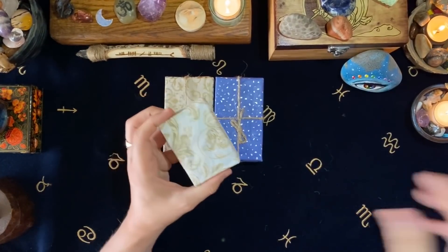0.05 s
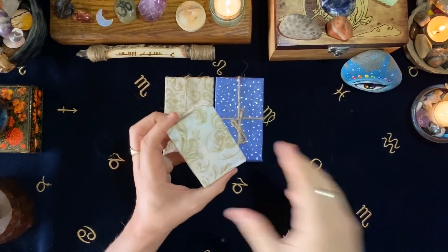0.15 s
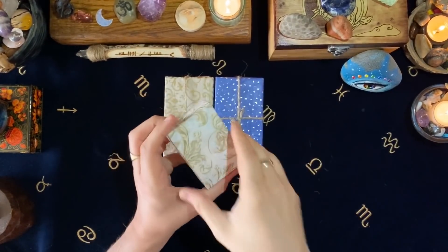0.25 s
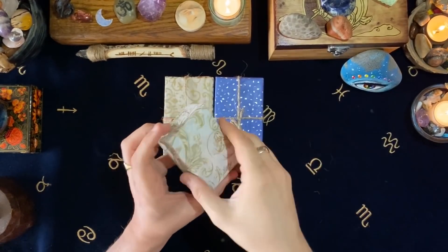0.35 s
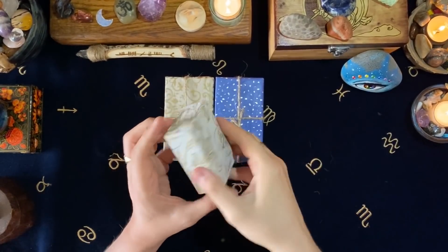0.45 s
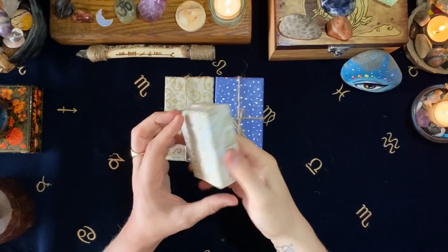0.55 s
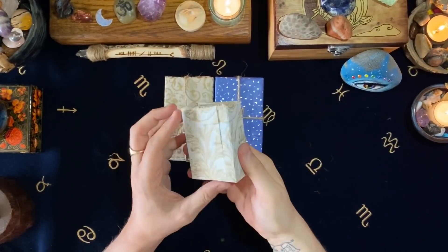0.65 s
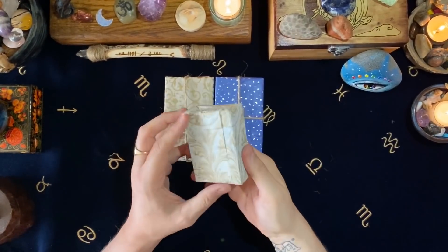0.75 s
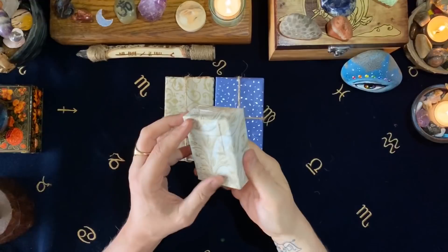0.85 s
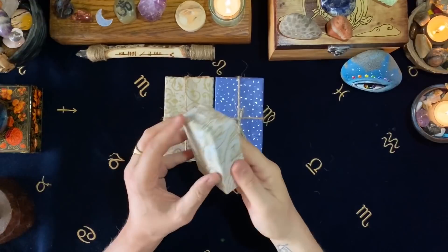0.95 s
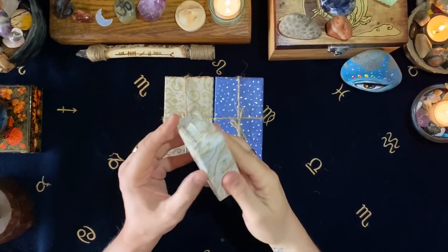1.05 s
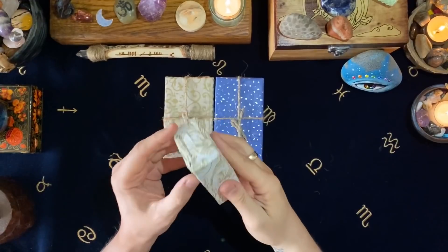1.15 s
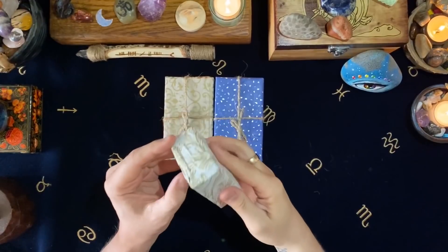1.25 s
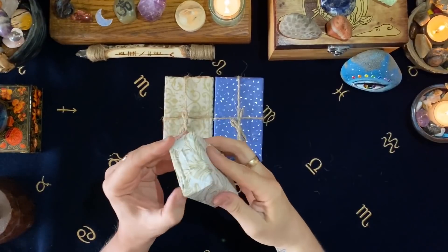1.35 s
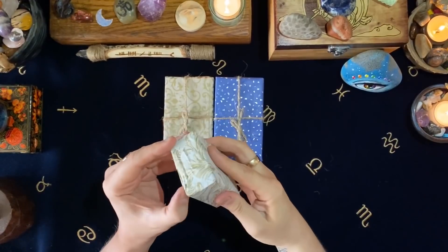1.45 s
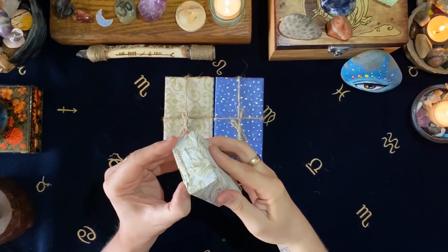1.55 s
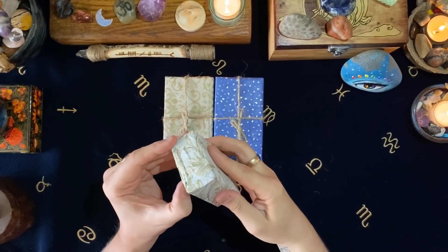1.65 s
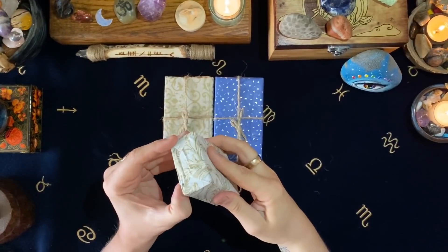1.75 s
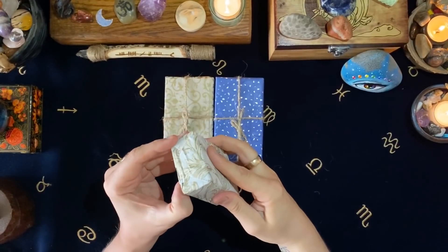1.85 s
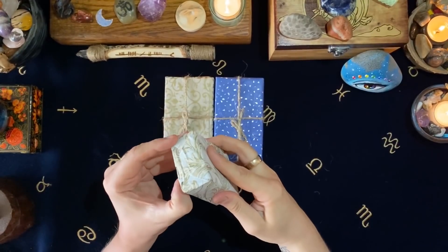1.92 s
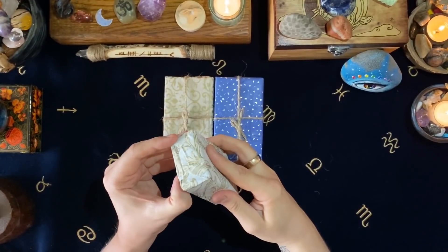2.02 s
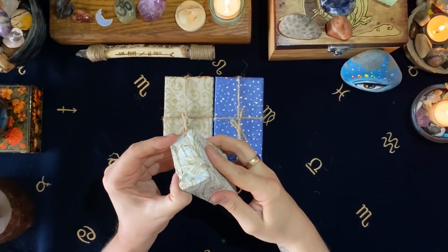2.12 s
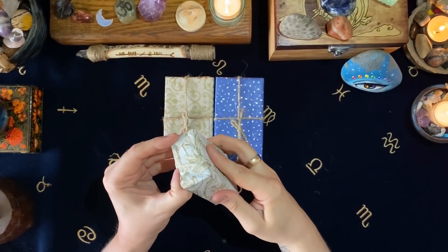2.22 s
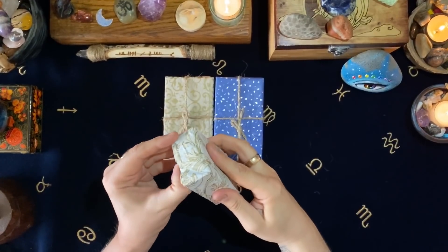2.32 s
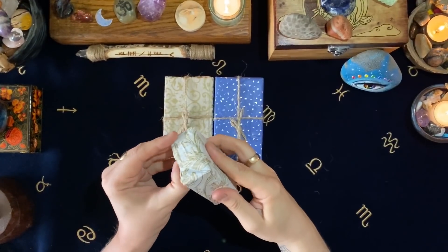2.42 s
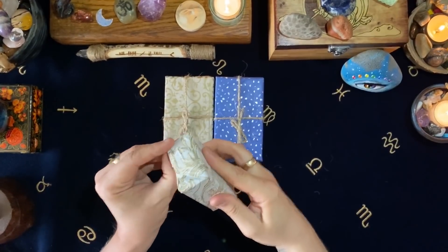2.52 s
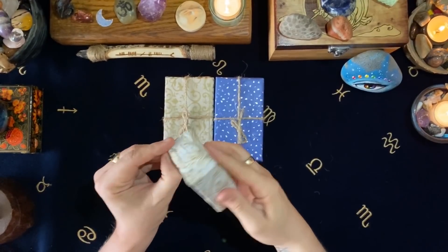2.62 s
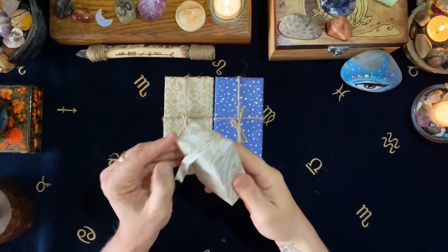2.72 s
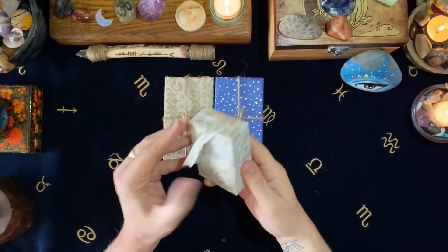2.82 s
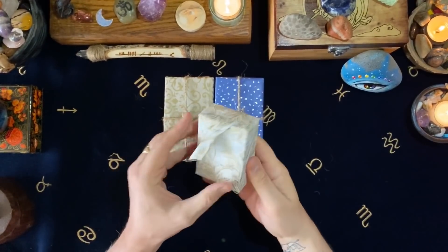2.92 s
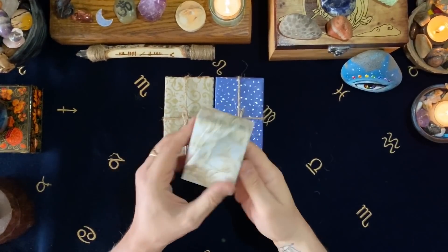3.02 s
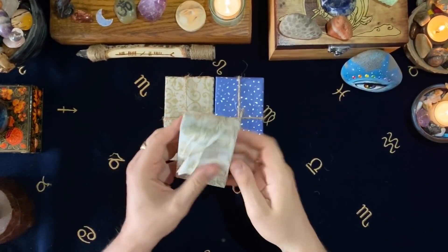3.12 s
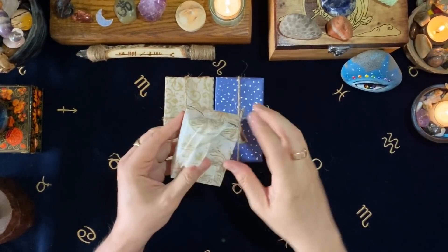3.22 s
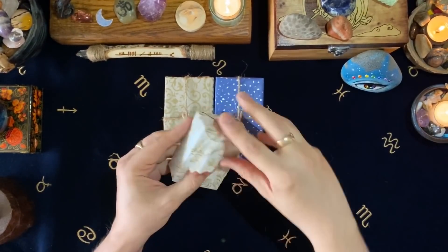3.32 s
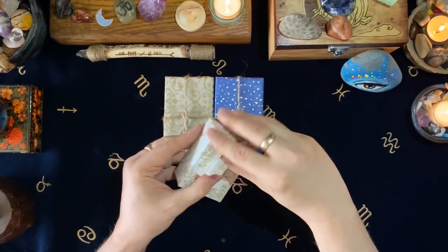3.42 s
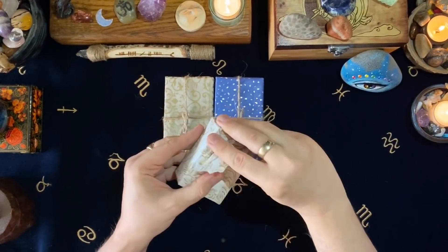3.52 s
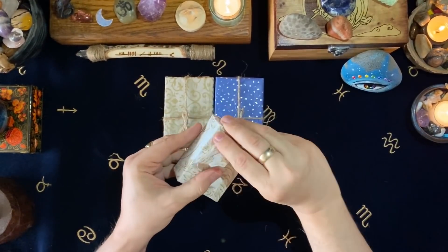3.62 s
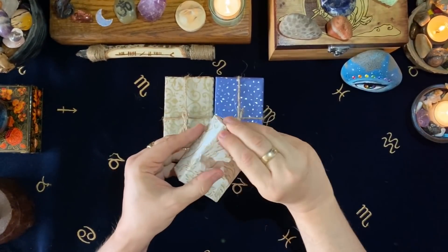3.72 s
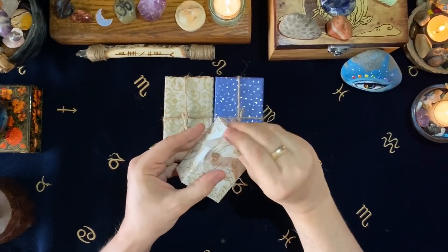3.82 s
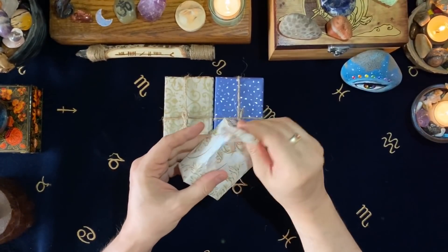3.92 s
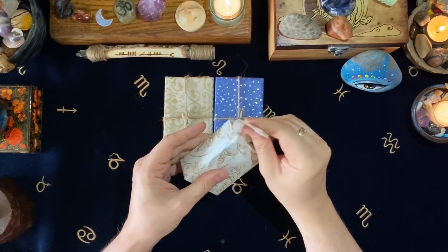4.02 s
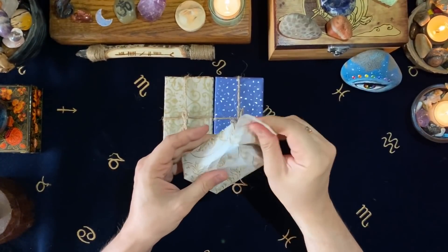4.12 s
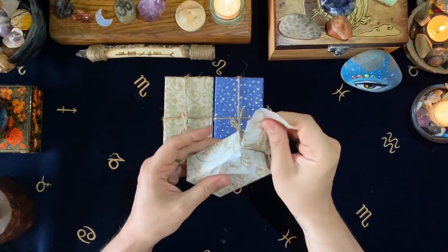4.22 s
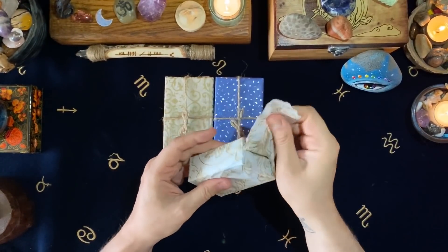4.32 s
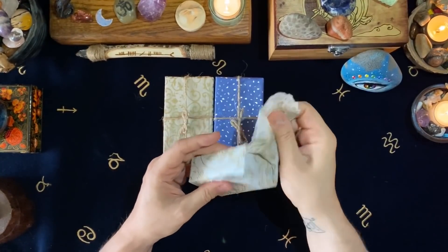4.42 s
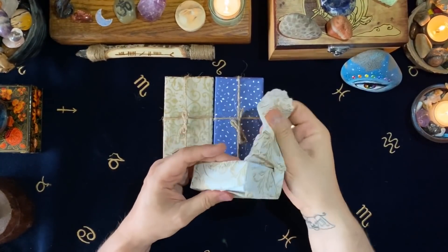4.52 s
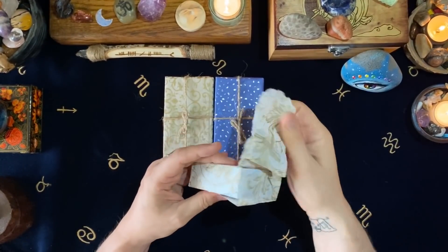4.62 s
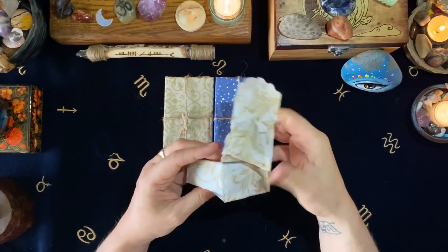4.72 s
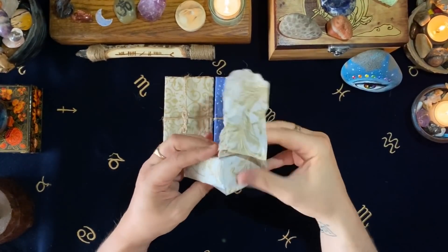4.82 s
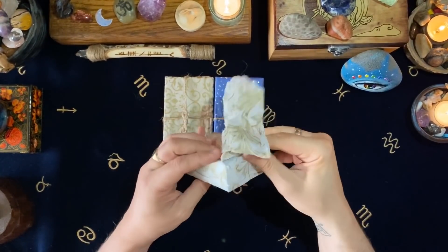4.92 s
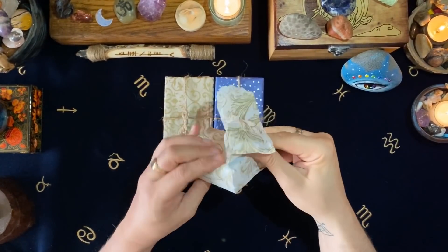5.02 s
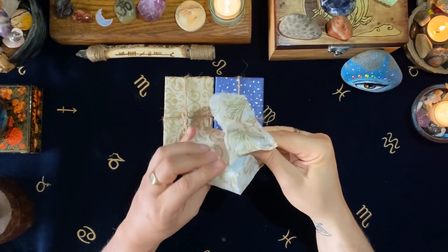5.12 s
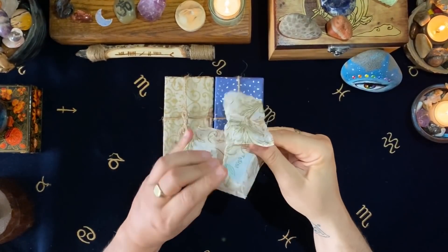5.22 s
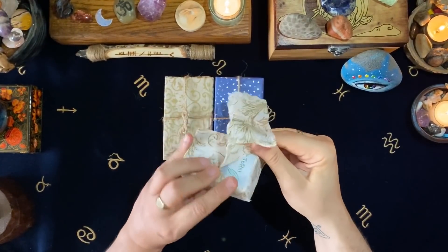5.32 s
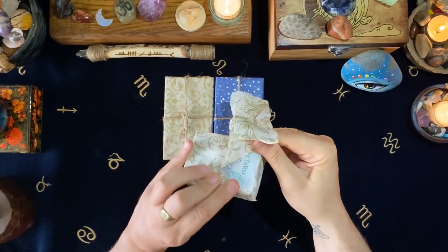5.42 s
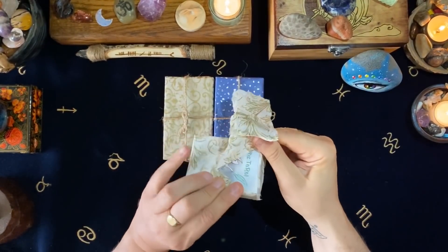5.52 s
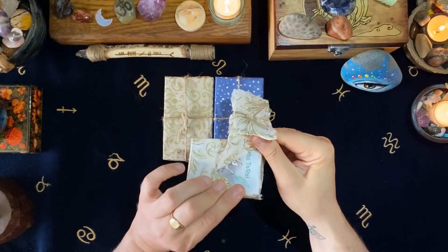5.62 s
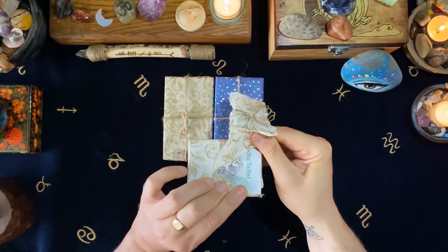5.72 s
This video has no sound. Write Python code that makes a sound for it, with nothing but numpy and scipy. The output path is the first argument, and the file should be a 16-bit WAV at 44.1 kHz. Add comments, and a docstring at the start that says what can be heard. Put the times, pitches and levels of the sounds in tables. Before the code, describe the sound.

Close stereo sound of stiff wrapping paper in a quiet, fairly dry room. Faint finger slides and creases come first, then a tight cluster of bright snaps, a softer pause, long crisp peeling strokes, a hard tear with a dull hollow knock from the box, and finally irregular snapping and rustling. Low rumble and very slight hiss lie beneath.

```python
"""Paper crackles, rubs, snaps and rips over a quiet room rumble, as two hands unwrap a small box.
They turn the parcel, pick an end flap loose, flip it, peel, rip the wrapper open and fold it back.
Crackle is a stream of tiny fibre releases that ring the hollow parcel, the sheet and its small facets.
Snaps are bursts of noise, drags are gliding resonances, and bumps are damped low tones.
A close microphone with two ports hears it all; the room is a faint echo, shaped noise and two tones."""
import sys
import numpy as np
from scipy import signal
from scipy.fft import rfft, irfft, next_fast_len
from scipy.io import wavfile
from scipy.ndimage import uniform_filter1d

SR = 44100
rng = np.random.default_rng(int(sys.argv[2]) if len(sys.argv) > 2 else 0)


def dump(signal):
    """Clip the signal to [-1, 1] and save it as 16-bit WAV at the path in sys.argv[1]."""
    limited = np.clip(np.atleast_2d(signal).T, -1, 1)
    pcm = np.round(limited * 32767).astype(np.int16)
    wavfile.write(sys.argv[1], SR, pcm)


N = 253575
TIME = np.arange(N) / SR  # s
HZ = np.fft.rfftfreq(N, 1 / SR)

# resonances of the parcel's air and walls while the wrapper is slack: f/Hz, width/Hz, level/dB
SLACK_PARCEL = [(576, 260, -18), (683, 36, -12), (822, 64, 4)]


def gesture(work, span, modes, sheet, per_s, spread_db, steady, broad, rest_db, hollow_db, sheet_db, crisp_db):
    """Fibres catch and let go in slips; the crackle is as loud as the hands press, faint while they hold."""
    first, last = (round(s * SR) for s in span)
    rest = gain_of(rest_db + np.array([[-9.5], [0], [0]]))  # the hollow part rests 9.5 dB lower
    force = np.sqrt(work[:, first:last] + rest ** 2)
    length = force.shape[1]

    # below a firm touch, fibres let go more rarely: a power of the force
    firm_db, rate_per_force = -52.5, 0.35
    rate = per_s * np.minimum(force[1] / gain_of(firm_db), 1) ** rate_per_force
    chance, strength = rng.random((2, length))
    size = gain_of(spread_db * np.minimum(-np.log(strength + 1e-9), 3.5))
    slipping = steady + slips(length, per_s=330, spread_db=4.5, fade_s=0.003)
    releases = (chance < rate / SR) * size * slipping
    crackle = folds(flicks(releases))

    # the hands feed in work at a steady pace, so a large release leaves less for its neighbours
    sound = np.zeros((2, length))
    levels = hollow_db, sheet_db, crisp_db
    for band, pressed, level in zip(voices(crackle, modes, broad, sheet), force, levels):
        nearby_power = abs(uniform_filter1d((band ** 2).mean(0), 1800))
        sound += band / np.sqrt(nearby_power + 1e-12) * pressed * gain_of(level)
    return span[0], sound


def handwork():
    """The power that all rubs and tears feed into the hollow, the sheet and the facets."""
    # fingers slide over the paper: start t/s, length/s, force/dB, change over the stroke/dB,
    # crispness against the force/dB
    strokes = [(0.233, 0.055, -59.5, -2.5, 1.5), (0.298, 0.39, -57, -7, 0.5), (0.716, 0.13, -65, -2, 2.5),
               (0.859, 0.37, -63.5, -7.5, 4.5), (1.141, 0.06, -57.5, 1.5, -2.5),
               (1.271, 0.056, -65, 5, 1.5), (1.369, 0.021, -64.5, -2.5, 0.5), (1.462, 0.055, -64, 5, -2),
               (1.577, 0.11, -74, -9.5, -3), (1.755, 0.016, -66, 5, 5.5), (1.805, 0.036, -64.5, 3, -2),
               (1.868, 0.034, -54, 3, -2.5), (1.971, 0.051, -52, 8.5, -2), (2.086, 0.23, -56.5, 6.5, 6),
               (2.33, 0.24, -54, -4.5, 0.5), (2.557, 0.069, -59.5, 8, 4), (2.853, 0.27, -60, 10, 1.5),
               (3.135, 0.03, -60, -7, 10), (3.22, 0.3, -62.5, 3, 2), (3.394, 0.066, -52, 8, -0.5),
               (3.528, 0.08, -43, -3, -5), (3.631, 0.27, -39, -5.5, 4.5), (3.929, 0.15, -45.5, -5.5, 3.5),
               (4.081, 0.14, -37.5, -10.5, 7), (4.242, 0.1, -35.5, -9, 3.5), (4.434, 0.16, -45.5, -6, 4),
               (4.791, 0.11, -51, 7, 2.5), (4.95, 0.093, -47.5, 0.5, 1), (5.065, 0.2, -47.5, -7.5, 3.5),
               (5.272, 0.025, -41, 4.5, 1), (5.315, 0.042, -47, -2, -0.5), (5.366, 0.13, -43, -2, 2),
               (5.558, 0.13, -52.5, 1, 4.5)]
    # the paper is pulled until it gives: moment it gives t/s, build-up/s, force/dB,
    # hollow resonance against the force/dB
    pulls = [(2.268, 0.044, -45.5, -12), (2.381, 0.0089, -47.5, -8), (2.436, 0.017, -32.5, -15),
             (3.57, 0.03, -37, -12.5), (3.719, 0.021, -38.5, -8), (4.147, 0.016, -43, -6.5),
             (4.286, 0.012, -39.5, -4), (4.414, 0.022, -29, -2), (5.156, 0.016, -36.5, -10.5)]
    return sum(rub(*row) ** 2 for row in strokes) + sum(tear(*row) ** 2 for row in pulls)


def rub(start, length, db, change_db, crisp_db):
    """A stroke takes hold quickly, eases or presses on, and lets go: amplitudes of hollow, sheet, facets."""
    attack_s, release_db_per_s = 0.029, 288
    t = TIME - start
    held = db + change_db * np.clip(t / length, 0, 1) - release_db_per_s * np.clip(t - length, 0, 1)
    # the parcel resounds even under a light touch, and grows more slowly than the force
    light_db, hollow_share = -59.5, 0.95
    hollow = -9 + light_db + hollow_share * (held - light_db)
    return np.clip(t / attack_s, 0, 1) * gain_of([hollow, held, held + crisp_db])


def tear(s, build_s, db, hollow_db):
    """Tension builds until the paper gives, then runs out: amplitudes of hollow, sheet and facets."""
    release_s, crisp_db = 0.043, 5
    t = TIME - s
    slope_s = np.where(t < 0, build_s, release_s)
    swell = np.exp(-np.minimum((t / slope_s) ** 2, 20))
    return gain_of([[hollow_db + db], [db], [crisp_db + db]]) * swell


def slips(size, per_s, spread_db, fade_s):
    """Stick and slip: each slip starts at once and fades within milliseconds."""
    chance, strength = rng.random(size), rng.standard_normal(size)
    starts = (chance < per_s / SR) * gain_of(spread_db * np.clip(strength, -2, 1.7))
    return evened(signal.lfilter([1], [1, -np.exp(-1 / (fade_s * SR))], starts))


def flicks(releases, hold_s=0.06, count=11):
    """Each release flicks one of the few facets under the fingers; fresh ones come up as the paper moves."""
    out = np.zeros((2, len(releases)))
    patch = rng.integers(0, count, len(releases))
    step = int(hold_s * SR)
    for start in range(0, len(releases), step):
        part = slice(start, start + step)
        for k in range(count):
            own = releases[part] * (patch[part] == k)
            add(out, start / SR, signal.fftconvolve(own[None], facet(ring_s=0.00059), axes=1))
    return out


def facet(ring_s, tone=0.83, size=400):
    """One patch of paper flicks: a brief dry crack of its own colour that differs in two directions."""
    t = np.arange(size) / SR
    ring = np.sin(2 * np.pi * (rng.uniform(1030, 10970) * t + rng.random((2, 1))))
    return evened((rng.standard_normal((2, size)) + tone * ring) * np.exp(-t / ring_s))


def folds(x, echo=0.28, pose_s=0.0401, count=7):
    """Fingers and folds of paper throw back brief echoes, which change as the hands shift their hold."""
    poses = np.arange(x.shape[1]) / SR / pose_s
    out = x.copy()
    for k, (delays, signs) in enumerate(rng.random((int(poses[-1]) + 2, 2, count))):
        held = x * np.sqrt(np.maximum(1 - abs(poses - k), 0))  # each pose fades into the next
        for delay, sign in zip(delays, signs):
            add(out, 0.00018 + 0.004 * delay, echo * np.sign(sign - 0.5) * np.exp(-delay) * held)
    return out


def voices(x, modes, broad=0.51, sheet=(), low_hz=1150, high_hz=5000):
    """What a crackle sets ringing, in three bands: the hollow parcel, the broad sheet, its crisp facets."""
    # colour of the sheet of paper: f/Hz, gain/dB
    paper_colour = [(80, -7), (250, -6), (600, -2.5), (1100, -4), (1500, 3), (2500, 5.5), (4000, 3),
                    (6000, -1.5), (7600, -0.5), (9000, -4), (10500, -9.5), (13500, -10), (15800, -13.5)]
    size = next_fast_len(x.shape[1] + 2048)
    hz = np.fft.rfftfreq(size, 1 / SR)
    ringing = sum(gain_of(db) * 1j * hz * w / (f ** 2 - hz ** 2 + 1j * hz * w) for f, w, db in modes)
    spectrum = rfft(x, size) * (ringing + broad) + rfft(flexing(x, sheet), size)
    spectrum = spectrum * gain_of(read(paper_colour, hz))

    above_low, above_high = (1 - 1 / (1 + (hz / edge) ** 8) for edge in (low_hz, high_hz))
    shapes = 1 - above_low, above_low * (1 - above_high), above_high
    return [irfft(spectrum * shape, size)[:, :x.shape[1]] for shape in shapes]


def flexing(x, modes):
    """The sheet bends in the hands, so each of its resonances wanders in pitch."""
    flex_share, flex_s = 0.045, 0.06  # typical pitch shift as a share, and time between new shifts
    steps = np.arange(x.shape[1]) / SR / flex_s
    out = np.zeros(x.shape)
    for hz, width, db in modes:
        bend = rng.standard_normal(int(steps[-1]) + 2)
        pitch = hz * np.exp(flex_share * np.interp(steps, np.arange(len(bend)), bend))
        out += gain_of(db) * resonate(x, pitch, width)
    return out


def snap(row, snap_db=-7.0, rise_s=0.0006, settle_db=-11, settle_ratio=7, size=2600):
    """A crease buckles with a broad, unpitched crack, and the sheet around it shivers a few times longer."""
    s, db, crisp, hollow, crack_s = row
    t = np.arange(size) / SR
    settling = gain_of(settle_db) * np.exp(-t / (settle_ratio * crack_s))
    shape = (1 - np.exp(-t / rise_s)) * (np.exp(-t / crack_s) + settling)
    crack = shape * np.sign(rng.standard_normal((2, size)))
    levels = hollow, 0, crisp
    sound = sum(evened(band) * gain_of(level) for band, level in zip(voices(crack, SLACK_PARCEL), levels))
    per_10_ms = np.sqrt(0.01 * SR / size)  # counts the energy as if it fell within 10 ms
    return s, gain_of(db + snap_db) * sound * per_10_ms


def crinkles(work, over_db=-9, crisp_db=5, crisp_spread_db=5, hollow_db=-11, top_db=-51, count=130):
    """Tiny creases tick at random, softer than the handling around them."""
    out = np.zeros((2, N))
    for place, colour in rng.random((count, 2)):
        handling_db = 10 * np.log10(work[1, int(place * N)] + 1e-12)
        db = min(handling_db + over_db, top_db)
        crisp = crisp_db + crisp_spread_db * (2 * colour - 1)
        add(out, *snap((place * N / SR, db, crisp, hollow_db, 0.00052)))  # last: decay of the crack in s
    return out


def drag(row, per_s=2500):
    """Tiny slips ring one panel, whose pitch glides as its free length changes."""
    start, length, db, hz, end_hz, width = row
    u = np.linspace(0, 1, int(length * SR))
    kicks = rng.standard_normal(len(u)) * (rng.random(len(u)) < per_s / SR)
    pitch = hz + (end_hz - hz) * u
    once = resonate(kicks, pitch, 2 * width)
    ring = resonate(once, pitch, 2 * width)  # two wide passes in a row make one narrower peak
    return start, gain_of(db) * evened(ring * np.sin(np.pi * u))[None]


def bump(row):
    """A soft, heavily damped knock of the parcel against the fingers."""
    s, db, hz, decay = row
    u = np.arange(SR // 3) / SR / decay
    swell = 2 * u * np.exp(1 - 2 * u)  # peaks at one
    return s, gain_of(db) * (swell * np.sin(2 * np.pi * hz * decay * u))[None]


def room_answer(x, t60=0.2, wet_db=-18):
    """A small furnished room answers with a faint, short, duller tail of random echoes."""
    t = np.arange(SR // 3) / SR
    taps = rng.standard_normal((2, len(t))) * (rng.random((2, len(t))) < 0.1) * (t > 0.003)
    tail = signal.lfilter([1], [1, -0.4], taps * gain_of(-60 * t / t60))  # softens the treble
    return gain_of(wet_db) * signal.fftconvolve(x, tail / np.linalg.norm(tail[0]), axes=1)[:, :N]


def room_floor(noise_db=-56):
    """Low rumble with faint hiss from shaped noise, plus a steady hum and a thin whine."""
    # colour of the rumble and hiss: f/Hz, relative level/dB
    noise_colour = [(12, -81), (20, -10.5), (49, 1), (92, 1.5), (153, -11), (219, -18.5), (342, -34),
                    (427, -31), (1160, -44), (5000, -53.5), (7310, -50), (10800, -48), (11700, -63),
                    (12800, -47), (15500, -80)]
    # steady hum and whine: f/Hz, level/dB
    steady_tones = [(75.4, -62), (11095, -92.5)]
    noise = irfft(rfft(rng.standard_normal((2, N))) * gain_of(read(noise_colour, HZ)), N)
    tones = np.zeros(N)
    for hz, db in steady_tones:
        tones += gain_of(db) * np.sqrt(2) * np.sin(2 * np.pi * (hz * TIME + rng.random()))
    return gain_of(noise_db) * evened(noise) + tones * np.array([[1], [0]])  # tones: shared part only


def resonate(x, hz, width):
    """A resonance of gain one that follows a pitch curve: shift down to zero, smooth, shift back up."""
    turn, r = np.exp(2j * np.pi * np.cumsum(hz) / SR), np.exp(-np.pi * width / SR)
    return 2 * (turn * signal.lfilter([1 - r], [1, -r], x / turn)).real


def gain_of(db):
    """Decibels to amplitude."""
    return 10 ** (np.asarray(db) / 20)


def evened(x):
    """Scales to an rms of one."""
    return x / np.sqrt(np.mean(x ** 2) + 1e-20)


def read(points, hz, axis=1):
    """Reads one column of a table on a log-frequency axis."""
    columns = np.transpose(points)
    return np.interp(np.log(hz + 1), np.log(columns[0] + 1), columns[axis])


def add(mix, s, sound):
    """Mixes a sound in at time s."""
    part = mix[:, max(round(s * SR), 0):][:, :sound.shape[1]]
    part += sound[:, :part.shape[1]]


def scene():
    """Gestures, snaps, drags, bumps and room, as a shared sound and a part that differs between the ports."""
    # resonances of the parcel with the wrapper closed, then pulled taut: f/Hz, width/Hz, level/dB
    closed_parcel = [(424, 260, -2), (820, 150, 5)]
    taut_parcel = [(250, 99, -19), (410, 130, 3), (690, 78, -1.5), (805, 280, -2)]
    # resonances of the sheet in each way it is held: f/Hz, width/Hz, level/dB
    turn_sheet = [(1440, 120, 0.5), (2700, 1100, 1.5), (7100, 500, -34)]
    pick_sheet = [(1480, 150, -6), (1650, 230, -13), (3200, 420, -14), (4870, 800, -4.5), (7300, 1100, -10)]
    peel_sheet = [(1560, 260, 0), (2540, 270, -3.5), (3260, 400, 2.5), (6600, 1600, -23)]
    rip_sheet = [(1350, 220, 2), (2420, 350, -1), (3070, 1200, -13), (7300, 3600, -5)]
    unfold_sheet = [(1350, 73, 8), (2370, 380, 11.5), (3340, 360, 12), (4660, 230, -6), (7070, 610, 5)]
    # creases that snap: t/s, level over 10 ms before the trim in snap()/dB, crispness against that/dB,
    # hollow resonance against that/dB, decay of the crack/s
    crease_snaps = [(0.09, -69.5, 10.5, -9, 0.0012), (0.304, -46.5, 3.5, -11, 0.00092),
                    (0.317, -49, -11, -5.5, 0.0019), (0.341, -59, -4, -11, .0006),
                    (0.377, -56, 6, 3, .0013), (0.433, -58, 6, -21, 0.0018), (0.468, -56, 6, -15, 0.00045),
                    (0.484, -55, -2, 0, .0006), (0.532, -55, -5, -5, .0007),
                    (0.565, -51.5, -14, -19, .0007), (0.64, -53.5, -7, -3.5, 0.00065),
                    (0.676, -65, -5, -14, .0005), (0.713, -54, 4, -17, 0.0019),
                    (0.794, -49.5, -4, -20, 0.00096), (0.827, -67.5, 21.5, -19, .0013),
                    (0.884, -54, -19, -9, 0.0019), (1.064, -60, -2, -22, 0.00056),
                    (1.55, -72, 0, -12, .0006), (1.696, -76.5, 13.5, -15, 0.00065),
                    (1.782, -51.5, 0, -16, 0.0012), (1.838, -58.5, 6.5, -3, 0.00066),
                    (1.922, -51.5, 9.5, -0.5, 0.0008), (2.01, -51, 4, -10, .001),
                    (2.022, -37.5, 1, -15, 0.0013), (2.043, -38, -2, -13, 0.001),
                    (2.087, -58, 10, -15, .0005), (2.104, -48, 5, -18, 0.0016),
                    (2.147, -52.5, 4.5, -8, 0.00081), (2.207, -40, 5, -3.5, 0.0023),
                    (2.269, -33.5, 9.5, -4.5, 0.0041), (2.3162, -43.5, 16, -7, .0013),
                    (2.374, -39, 11.5, -10, .0011), (2.379, -36.5, 7, -4, 0.0012),
                    (2.392, -32.5, 5.5, -15.5, 0.0015), (2.414, -32.5, 5, -5, 0.0013),
                    (2.422, -35, 5, -16, .0008), (2.434, -30, 9, -20, 0.0013),
                    (2.444, -31, -8, -12, 0.0013), (2.47, -43, 8, -7, 0.00046),
                    (2.487, -36, 8, -5.5, 0.0017), (2.517, -53, 13, -12, .0006),
                    (2.711, -56, -6, -12, 0.0006), (2.765, -60, 4, -8, 0.00086),
                    (2.798, -59, 7.5, -11, .0013), (2.81, -70.5, 19, -12, 0.00071),
                    (2.951, -46.5, -14, -4.5, 0.0018), (3.044, -45, -3, -27, 0.0012),
                    (3.121, -40, -1.5, -3.5, 0.00088), (3.163, -51.5, 7.5, -10, 0.0011),
                    (3.211, -73, 8, -18, .0005), (3.225, -60.5, 9, -20, 0.00055),
                    (3.245, -50, 6, -29, 0.0029), (3.298, -62, 13.5, -18, 0.00078),
                    (3.448, -43, 2, -14, 0.0015), (3.469, -47, -1, -10, .0006), (3.536, -45, 7, -22, .0013),
                    (3.555, -39.5, 5.5, -12, .0013), (3.584, -39.5, 13, -7, 0.0024),
                    (3.601, -40, 4, -11, .0007), (3.623, -35, 0.5, -15.5, 0.0011),
                    (3.657, -37, 12.5, -9, 0.00058), (3.695, -32, -15, -8, 0.0016),
                    (3.712, -35.5, -4, 2.5, 0.0028), (3.738, -40, 14, -17, 0.00087),
                    (3.842, -36.5, 1, -13, 0.0012), (4.047, -41.5, -6, -6, .0005),
                    (4.068, -51, 8, -5, .0005), (4.099, -44, 10.5, -3, .0015),
                    (4.159, -34, 0, -8.5, 0.0012), (4.232, -49.5, 6, -5, 0.00039),
                    (4.276, -39, 5.5, -3, 0.0012), (4.395, -27.5, -6, -17, .0016),
                    (4.435, -30, -16, -2, .0013), (4.516, -40, -15, -8, .0008),
                    (4.54, -41.5, 3, -7, 0.0009), (4.572, -38.5, -2.5, -8, 0.0013),
                    (4.702, -51, -1, -29, 0.00054), (4.753, -55.5, -5, -10, .0008),
                    (4.899, -48, 2, -10, 0.00076), (4.921, -41.5, -7, -26, 0.00097),
                    (4.977, -40.5, -6, -25, .001), (5.021, -39.5, -12, -9, 0.0018),
                    (5.037, -43.5, 11.5, 3.5, 0.0013), (5.107, -35, 3.5, -9, 0.0018),
                    (5.121, -35, 6, -3.5, 0.001), (5.133, -30.5, -11, -6, 0.00098),
                    (5.161, -24.5, 3.5, -8.5, 0.0012), (5.183, -40, 12, 4, 0.00091),
                    (5.292, -37.5, -1, -7, 0.0026), (5.376, -39.5, 7, -6, 0.0016),
                    (5.461, -51, 9, -16, 0.00073), (5.477, -50, 9, -23, 0.00092),
                    (5.497, -32.5, 3, -18, 0.0019), (5.531, -39.5, 3.5, -8, 0.0018),
                    (5.578, -45, 4, -17, .001), (5.586, -48, 6, -18, .0006), (5.613, -33.5, 0, -30, 0.0013),
                    (5.62, -36.5, -5, -10, 0.001), (5.63, -39, 3, -4.5, 0.0011),
                    (5.649, -47, 6, -17, 0.0013), (5.676, -35, 5, -12.5, 0.0012),
                    (5.706, -44.5, 9.5, -15, 0.0017)]
    # one panel sings as it drags: start t/s, length/s, level/dB, f/Hz, f at the end/Hz, width/Hz
    panel_drags = [(1.368, 0.047, -67, 3600, 3570, 160), (3.317, 0.1, -69, 950, 1030, 140),
                   (3.691, 0.046, -43.5, 1580, 1650, 400), (3.84, 0.28, -56, 2750, 2370, 240),
                   (4.124, 0.058, -43, 730, 724, 148), (4.272, 0.055, -43.5, 690, 660, 129),
                   (5.123, 0.035, -40.5, 1300, 1350, 382), (5.667, 0.022, -50, 1390, 1390, 70)]
    # the parcel bumps in the hands: t/s, peak level/dB, f/Hz, decay/s
    parcel_bumps = [(0.372, -57.5, 344, 0.0061), (1.849, -44.5, 76, 0.029), (2.287, -37.5, 90.5, 0.012),
                    (2.392, -49.5, 196.5, 0.014), (2.467, -40.5, 71, 0.044), (3.121, -52, 151, 0.026),
                    (4.272, -48, 48, 0.099), (4.409, -41, 277, 0.011), (4.442, -34, 226, 0.0061)]

    paper, work, background = np.zeros((2, N)), handwork(), room_floor()
    # turn the parcel
    add(paper, *gesture(work, (0, 1.75), closed_parcel, turn_sheet, per_s=2800, spread_db=-0.5, steady=6.9,
                        broad=2.1, rest_db=-88.5, hollow_db=-2, sheet_db=-1.5, crisp_db=0.0))
    # pick an end flap loose
    add(paper, *gesture(work, (1.75, 2.84), SLACK_PARCEL, pick_sheet, per_s=3000, spread_db=-0.5, steady=1.0,
                        broad=0.72, rest_db=-69.5, hollow_db=0.5, sheet_db=-3.0, crisp_db=-0.5))
    # flip the parcel
    add(paper, *gesture(work, (2.84, 3.2), closed_parcel, turn_sheet, per_s=7300, spread_db=2.5, steady=3.3,
                        broad=1.9, rest_db=-70, hollow_db=-2.0, sheet_db=-2.5, crisp_db=-1.0))
    # peel
    add(paper, *gesture(work, (3.2, 4.09), SLACK_PARCEL, peel_sheet, per_s=3000, spread_db=0.0, steady=1.0,
                        broad=0.76, rest_db=-66.0, hollow_db=-4.0, sheet_db=-3.5, crisp_db=-2.0))
    # rip the wrapper open
    add(paper, *gesture(work, (4.09, 4.68), taut_parcel, rip_sheet, per_s=7500, spread_db=2.5, steady=2.4,
                        broad=0.3, rest_db=-64.5, hollow_db=-2.5, sheet_db=-3.0, crisp_db=-4.5))
    # fold it back
    add(paper, *gesture(work, (4.68, 5.75), SLACK_PARCEL, unfold_sheet, per_s=3000, spread_db=3.0, steady=1.0,
                        broad=0.99, rest_db=-65.0, hollow_db=0.0, sheet_db=-3.0, crisp_db=0.5))
    for row in crease_snaps:
        add(paper, *snap(row))
    for row in panel_drags:
        add(paper[:1], *drag(row))  # shared part only
    for row in parcel_bumps:
        add(paper[:1], *bump(row))
    paper += crinkles(work)
    return paper + room_answer(paper) + background


def record(dry):
    """The two ports hear the scene with a lag and a balance that depend on frequency; then the band limit."""
    # the two microphone ports: f/Hz, lead of the left/rad, likeness (0 to 1)
    port_match = [(70, 0, .996), (150, 0, .985), (400, -.1, .97), (660, -.7, .7), (830, .2, .85),
                  (1300, -.4, .82), (1900, .05, .98), (2900, .9, .72), (3500, .4, .85), (4300, .7, .75),
                  (5200, .1, .9), (6300, 1.9, .8), (7050, 3.1, .995), (7700, 3.2, .995), (8600, 4.2, .72),
                  (9800, 6.25, .97), (11300, 6.3, .98), (12100, 7.9, .65), (13000, 9.4, .995),
                  (14300, 9.45, .995), (15300, 12, .6)]
    # left minus right: f/Hz, level/dB
    left_balance = [(75, 0), (150, -2.5), (450, -3), (740, -6), (1220, -4.5), (2000, -1), (3300, -3),
                    (5500, 0)]
    edge_hz = 15900
    shared, other = rfft(dry)
    lead = read(port_match, HZ, axis=1)
    same = np.clip(read(port_match, HZ, axis=2), 0, 0.998)
    right = (same * shared + np.sqrt(1 - same ** 2) * other) * np.exp(-1j * lead)
    side = gain_of(read(left_balance, HZ) / 2)  # half the difference goes to each port
    pair = irfft(np.array([shared * side, right / side]), N)
    low_pass = signal.firwin(511, edge_hz, window=("kaiser", 9), fs=SR)
    return signal.oaconvolve(pair, low_pass[None], "same")


dry = scene()
out = record(dry)
dump(out)
```